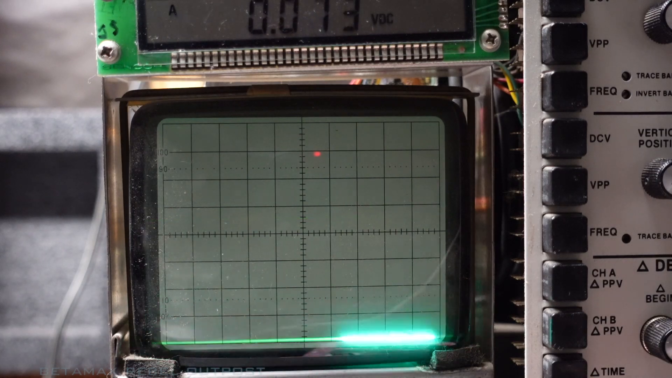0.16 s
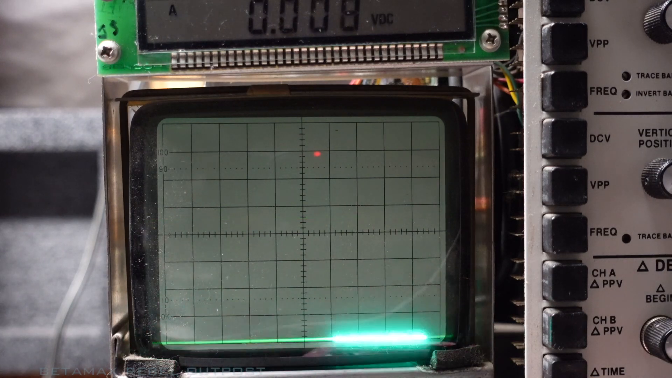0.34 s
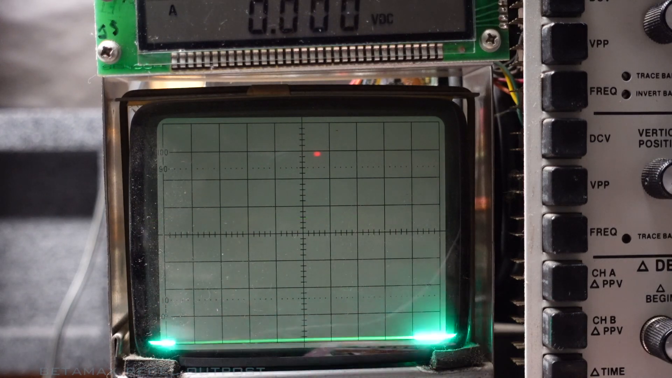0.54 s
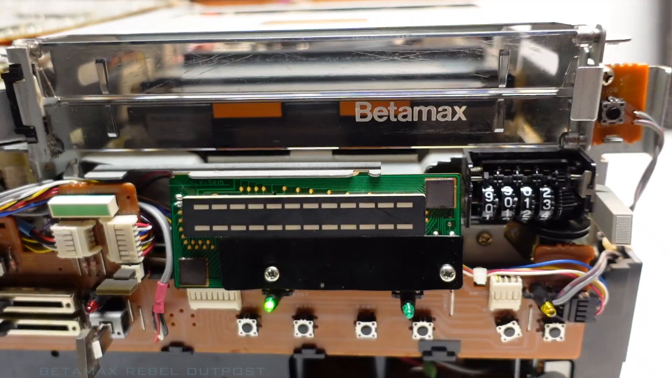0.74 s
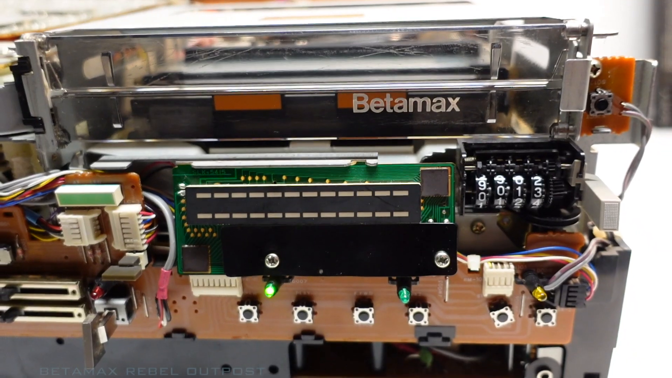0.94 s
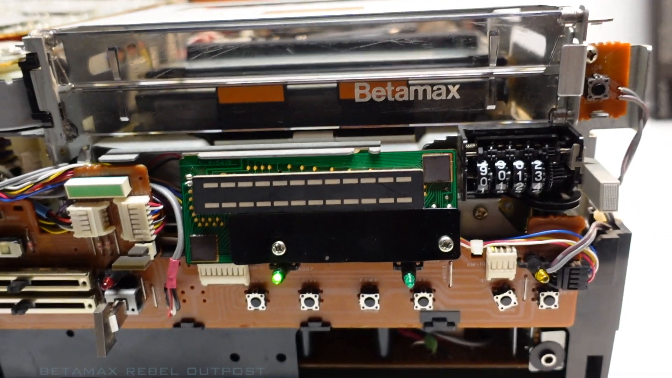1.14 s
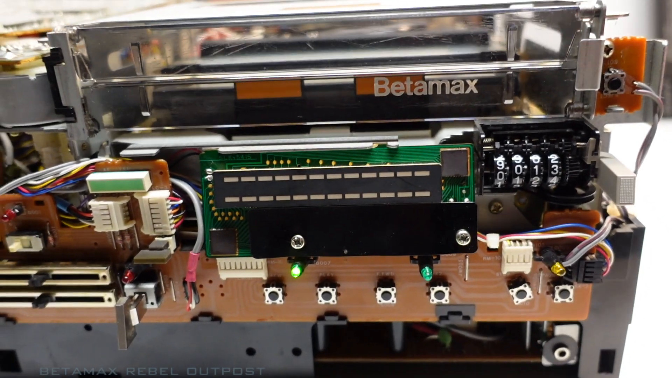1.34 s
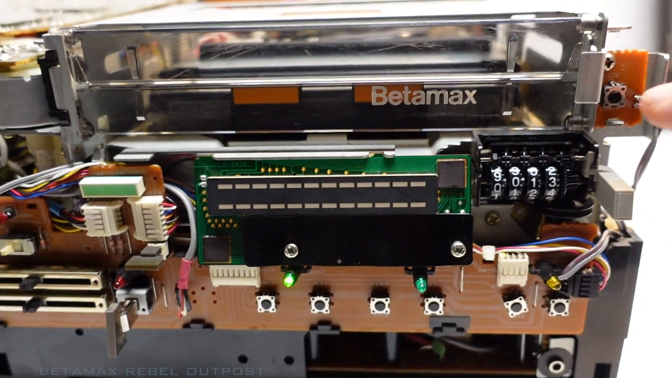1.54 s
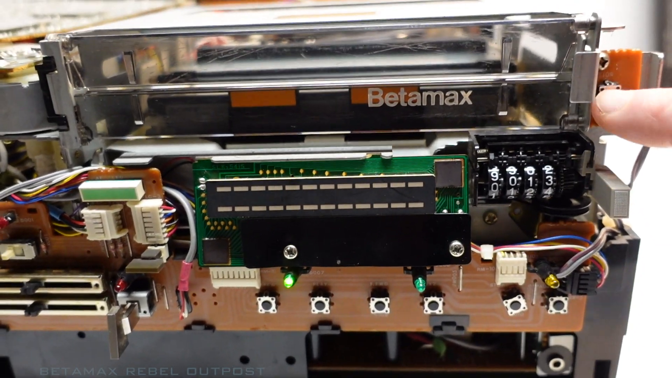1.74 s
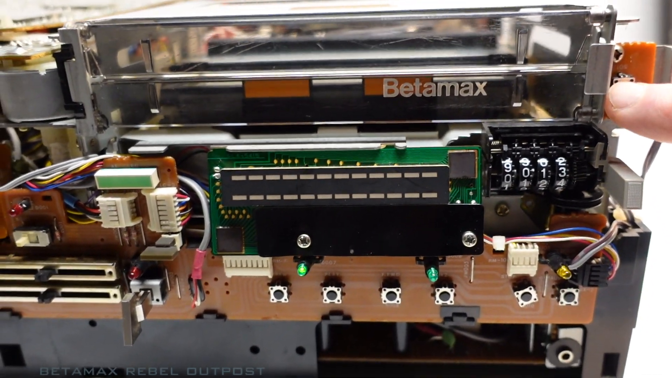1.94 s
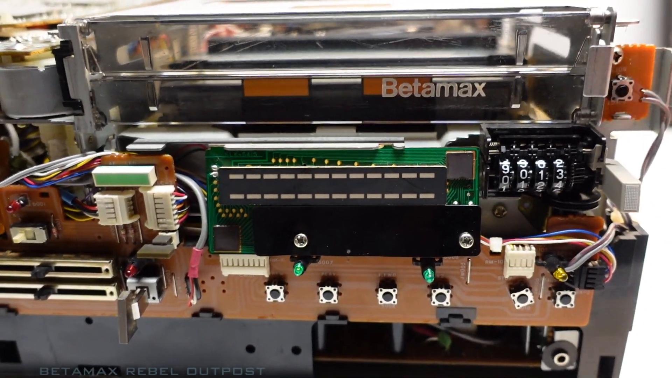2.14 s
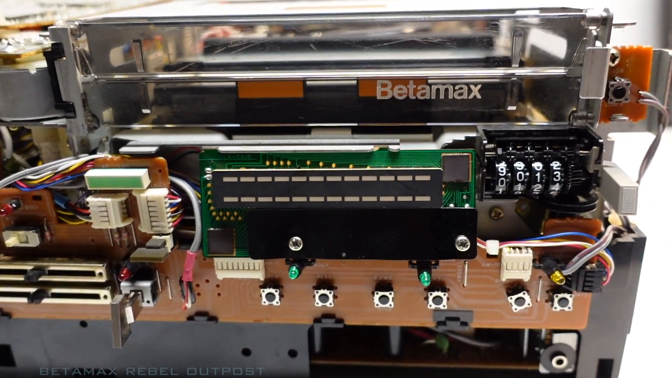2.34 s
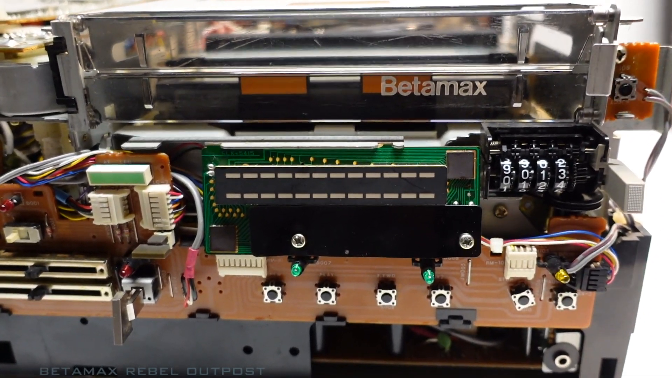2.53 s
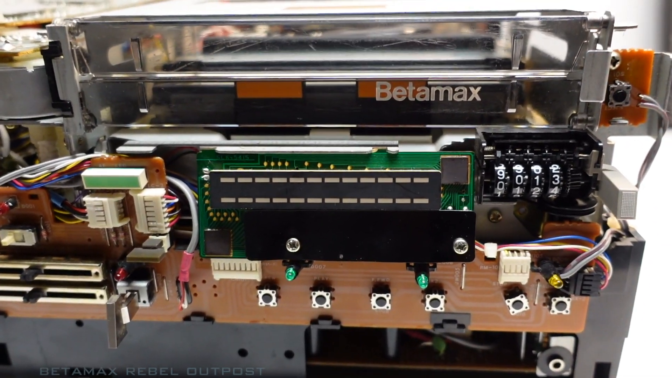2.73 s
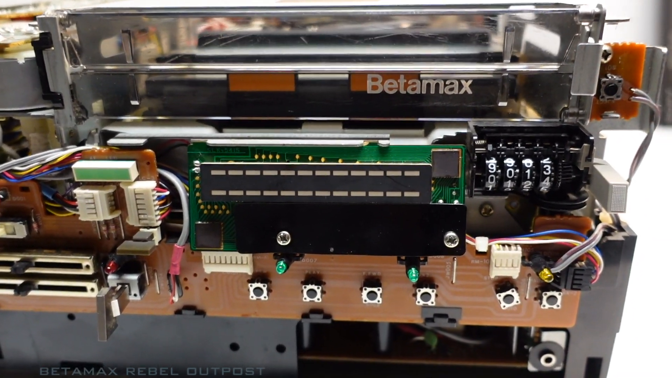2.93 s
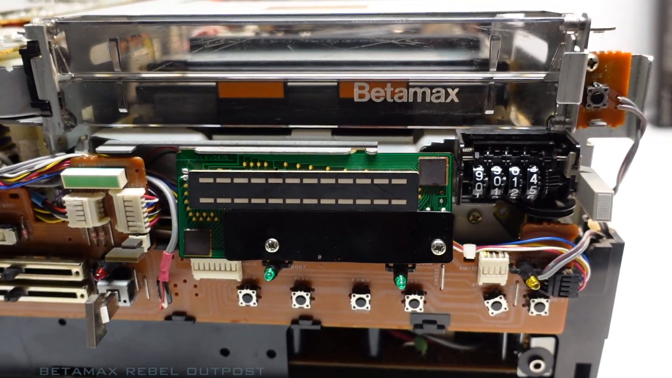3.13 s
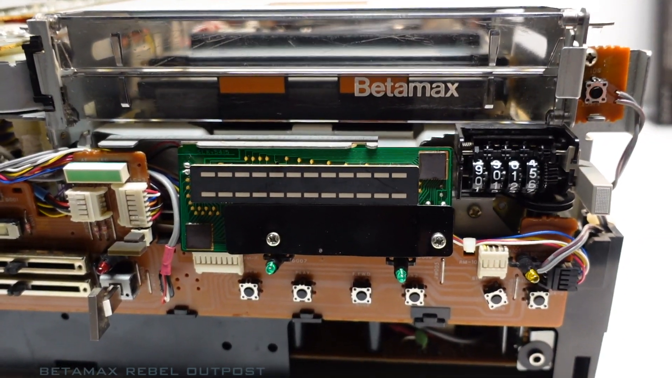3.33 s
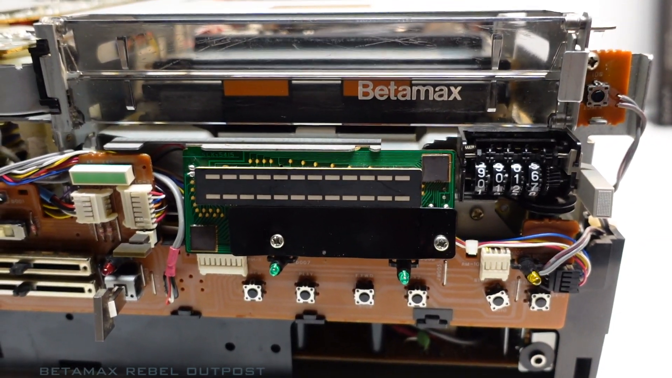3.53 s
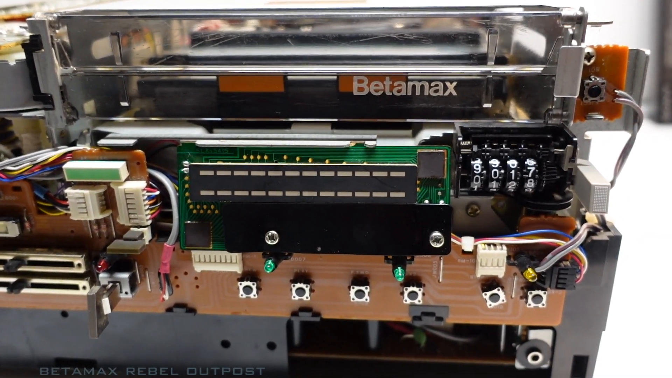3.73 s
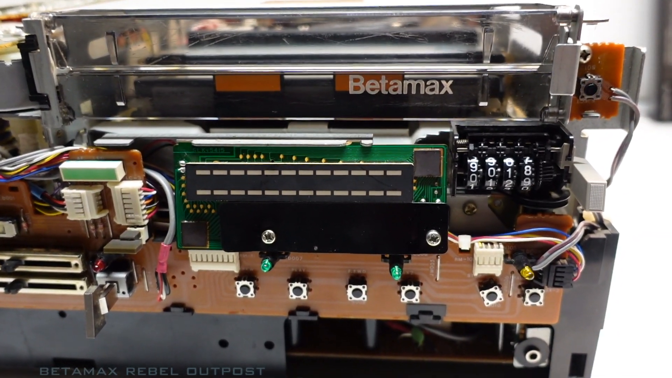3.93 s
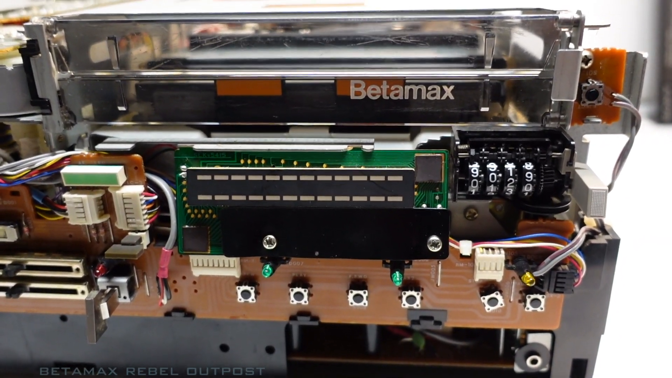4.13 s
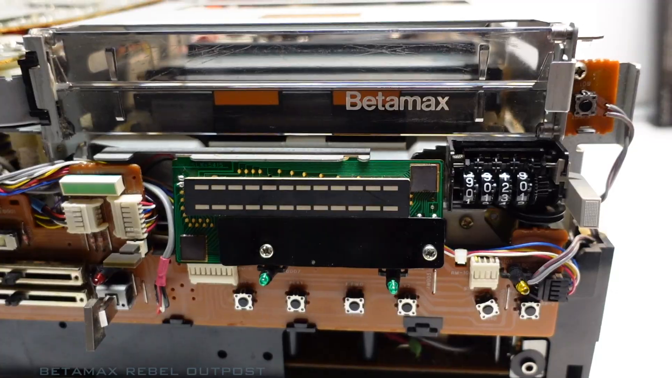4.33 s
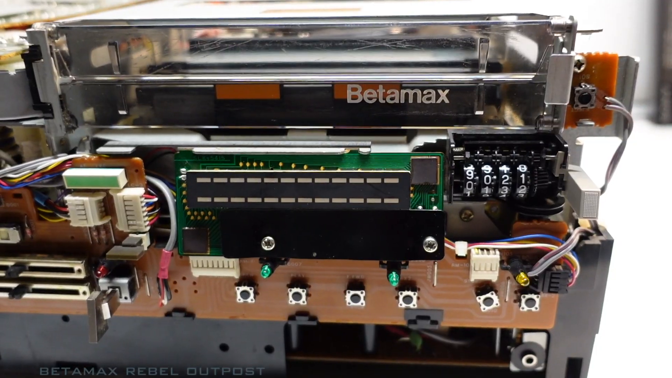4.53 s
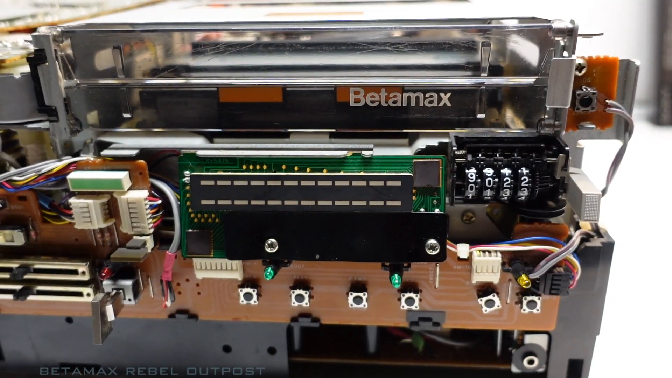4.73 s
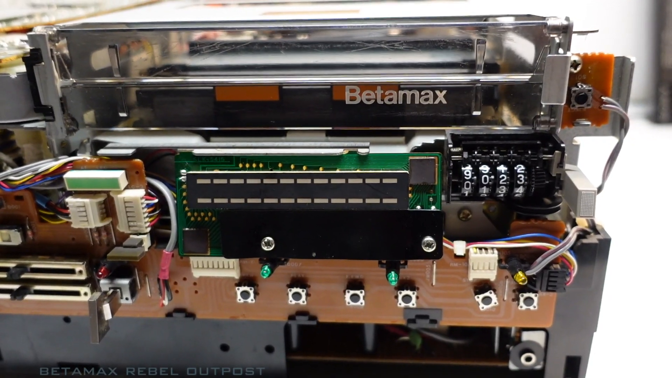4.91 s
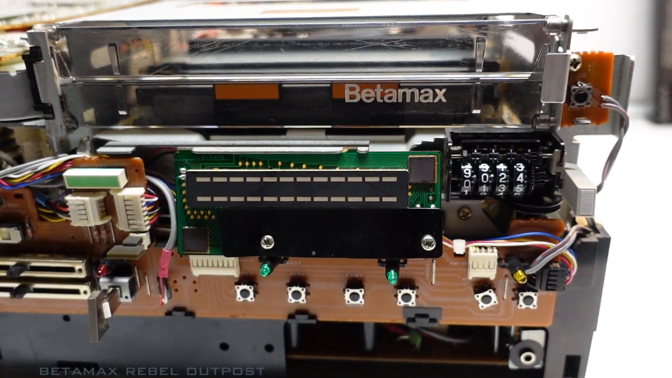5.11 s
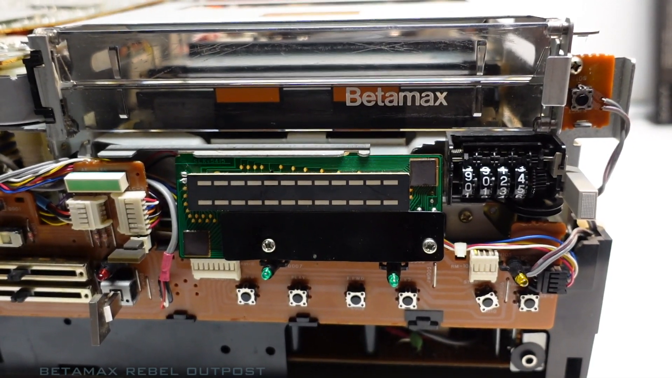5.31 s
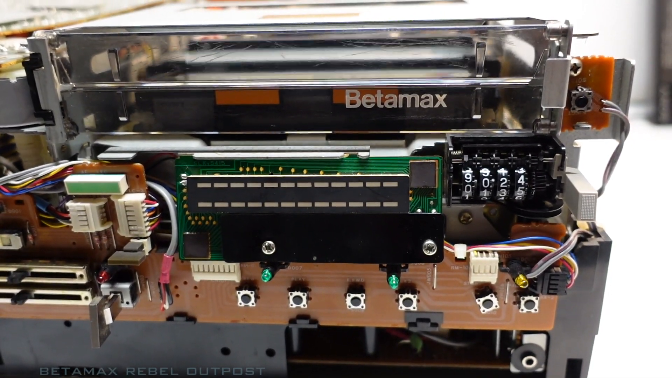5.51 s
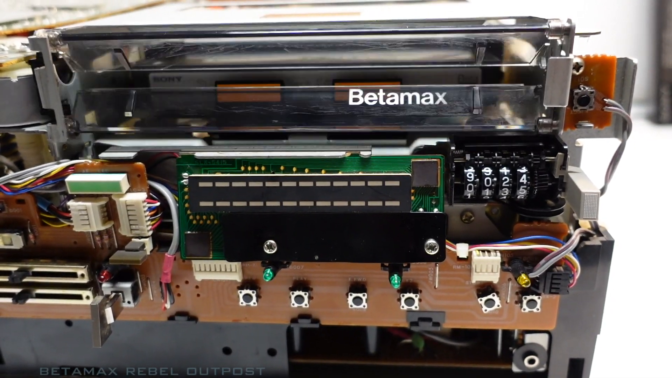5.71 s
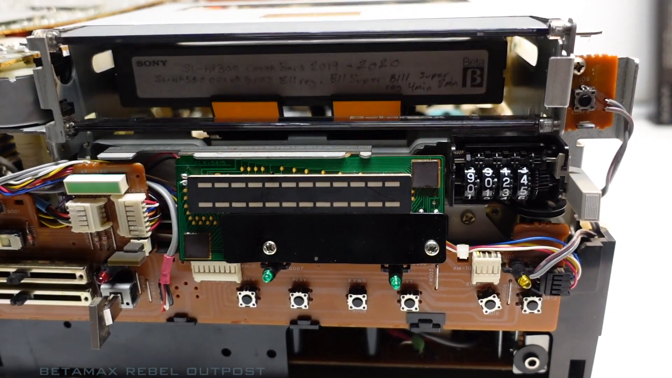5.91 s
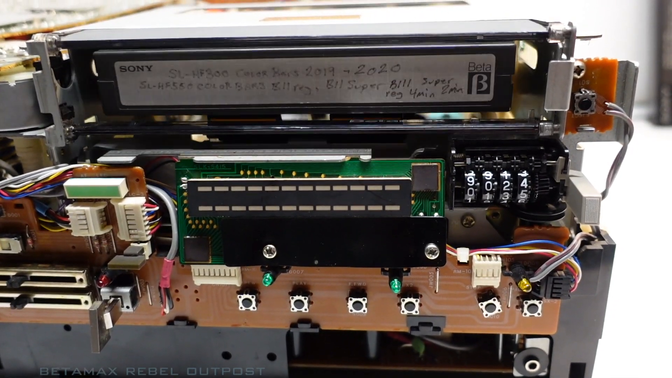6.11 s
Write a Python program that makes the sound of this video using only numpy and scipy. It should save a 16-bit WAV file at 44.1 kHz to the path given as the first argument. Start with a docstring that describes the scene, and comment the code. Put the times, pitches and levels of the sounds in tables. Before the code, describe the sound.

Up close, an opened tape deck idles, clacks heavily through its levers, whirs at speed, stops hard, then hisses and rattles its cassette upward.

```python
"""Open videocassette deck on a bench

First a picture tube whistles over the distant deck, made of wavering sine tones. Then, close up, the motor idles
and the reels wind tape: coloured noise with partials on top. Button, pawls, levers and the rising cassette
carriage are built from single blows, each a gritty noise burst, some with ringing modes. The brakes snap on and
an eject motor hisses before the carriage clatters up."""
import sys
import numpy as np
from scipy import signal
from scipy.fft import rfft, irfft, next_fast_len
from scipy.io import wavfile
from scipy.ndimage import map_coordinates

SR = 44100
rng = np.random.default_rng(int(sys.argv[2]) if len(sys.argv) > 2 else 0)


def put_to_file(sound):
    """Save the sound as 16-bit audio at rate SR, in the file named by the first command-line argument."""
    columns = np.atleast_2d(sound).T  # one column per channel
    safe = np.clip(columns, -1, 1)
    whole_steps = np.round(safe * 32767)
    wavfile.write(sys.argv[1], SR, whole_steps.astype(np.int16))


N = 271656

# Levels of contacts are relative: each source sets its own overall gain.
# Lever strokes. Each row: start in seconds, travel in seconds, level leaving in dB, level seating in dB,
# brightness leaving in dB, brightness seating in dB.
LEVER_STROKES = [(1.872, .018, -8, -16.5, -14, 19), (2.358, 0.016, -12.5, -8, -14, -4),
                 (2.4822, .011, -11, -6.5, 6, -6.5), (2.6605, .0203, -9.5, -7.5, 0.5, -5),
                 (5.1224, .0248, -4, -8.5, -7, 1)]
# Single clicks of pawls and springs. Each row: start in seconds, level in dB, hardness in dB.
SMALL_CLICKS = [(1.8655, -21.5, -6), (1.9467, -19, 12), (2.3525, -25, -13), (2.4738, -14, -2),
                (2.8666, -27, -18), (2.9083, -14, 5.5), (4.3054, -17.5, 11), (4.5448, -23, 8),
                (4.7047, -23, 10), (4.8019, -14.5, -10)]
# Latch clicks and knocks of the cage. Each row: start in seconds, level in dB, hardness in dB.
LATCH_CLICKS = [(5.5323, -21.5, 2.5), (5.5508, -20.5, -10), (5.5982, -7.5, 9.5), (5.7444, -27, -30),
                (5.7882, -21, -3.5), (6.0387, -29.5, -13), (6.1125, -15.5, -7), (6.136, -20.5, -4)]
# Snaps of the push button's dome. Each row: start in seconds, level in dB.
BUTTON_SNAPS = [(1.736, -28), (1.8003, -14.5)]
# The cage rubbing along its guides. Each row: time in seconds, level in dB.
SLIDING_LEVEL = [(5.7, -100), (5.8, -62), (5.818, -22.5), (5.835, -46), (5.87, -34), (5.92, -44),
                 (5.98, -36.5), (6.03, -53), (6.12, -42), (6.16, -46)]
# How hard the levers load the motor. Each row: time in seconds, load from 0 to 1.
MOTOR_LOAD = [(1.9, 0), (2.2, 1), (2.5, 0.8), (2.95, 0)]

# Ringing modes of the chassis and the cage. Each row: frequency in Hz, width in Hz, relative level in dB.
CHASSIS_MODES = [(755, 14, -1), (1313, 99, 5), (1855, 160, 9), (2730, 220, -1), (3150, 260, 11),
                 (3950, 380, 13), (4070, 19, 5), (5600, 110, -3), (7540, 100, 2), (8470, 33, 13),
                 (9840, 54, -6), (10300, 12.7, -4), (11900, 210, 9)]
CAGE_MODES = [(718, 130, 0.5), (1152, 98, -2), (2226, 170, 1), (3440, 50, -4), (5460, 75, -10),
              (6020, 105, 1.5), (8080, 210, 1), (8520, 210, 5), (9750, 140, -1.5), (11350, 80, -7.5),
              (13600, 84, -5), (14300, 91, -15)]
# Colours of the blows. Each row: frequency in Hz, relative spectral level in dB.
LEVER_COLOUR = [(88, -34), (150, -18.5), (612, -10), (759, -2), (941, -5.5), (2600, -0.5), (3420, -4),
                (4160, -0.5), (4950, -5.5), (5790, 0.5), (7320, -5), (15100, -7.5), (16000, -3)]
CARRIAGE_COLOUR = [(88, -40), (150, -35), (320, -16.5), (480, -15), (745, 0), (941, -15), (1340, -15),
                   (1790, -8.5), (3490, -11.5), (4410, -13.5), (6020, -5.5), (7320, -12), (8400, -11),
                   (9260, -16), (14200, -25.5), (16000, -26)]
CLICK_COLOUR = [(240, -71), (400, -9), (789, -10), (2290, 3), (2970, 1), (4050, 0), (6640, -3),
                (10100, -10), (16000, -19)]
BUTTON_COLOUR = [(2000, -32), (6000, -13.5), (10000, 5), (13000, -10), (16000, -29)]
# Colours of the booming bench and side panels. Each row: frequency in Hz, relative spectral level in dB.
BENCH_BOOM = [(60, -41), (95, -7.5), (120, -1.5), (148, 1.5), (185, -23), (300, -51), (600, -90)]
PANEL_BOOM = [(100, -27), (220, -15.5), (350, -1), (500, -6), (760, 2.5), (1100, -14.5), (2500, -35)]
# Colours of the running sounds. Each row: frequency in Hz, relative spectral level in dB.
WIND_COLOUR = [(24, -52), (40, -26), (106, -2.5), (180, -10.5), (320, -7.5), (444, -17), (529, -9),
               (852, -2.5), (1590, -7), (1810, 0), (2100, -9), (5870, -11.5), (9690, -20.5), (13100, -20.5),
               (16000, -25.5)]
EJECT_COLOUR = [(18, -33), (30, -3), (204, -4), (280, -11.5), (394, -4), (473, -12), (760, -3.5),
                (1590, -7.5), (1860, 0), (2170, -8.5), (5040, -12), (13000, -12.5), (14400, -22),
                (16000, -32)]
IDLE_COLOUR = [(88, -31), (150, -22.5), (439, -21.5), (1040, -13.5), (1360, -22.5), (1600, -13), (1790, 0),
               (2140, -17.5), (2980, -13.5), (3550, -23.5), (4200, -17.5), (5500, -18.5), (7040, -34),
               (7700, -25), (8500, -32), (10000, -25), (14500, -37), (16000, -36)]
ROOM_COLOUR = [(18, -73), (30, -39), (61, -17), (149, -26), (781, -21), (907, -13), (1140, -14),
               (1230, -19), (1660, -11), (1830, -30), (2080, -18.5), (3150, -21), (3600, -29.5),
               (5660, -23.5), (6570, -39.5), (10300, -28), (12000, -42), (15600, -81), (22000, -120)]
# Steady tones at nominal speed. Each row: frequency in Hz, level in dB rms before the source's own gain.
WIND_PARTIALS = [(107.7, -60), (323.0, -60), (532.9, -56.5), (850.6, -51), (1066, -51), (1330, -51.5),
                 (1809, -49), (2676, -58), (2842, -58)]
IDLE_PARTIALS = [(855.9, -67), (1055, -64), (1755, -61), (1793, -61), (1852, -51.5), (1985, -70),
                 (2245, -65.5), (2455, -66.5), (2649, -66.5), (3042, -65)]
FAR_PARTIALS = [(937, -74), (1852, -65), (1874, -60), (2302, -76)]
# Sizzle of the eject motor's brushes. Each row: frequency in Hz, width in Hz, level in dB rms at full speed.
BRUSH_BANDS = [(6900, 200, -66), (8500, 600, -66), (11200, 500, -66), (13800, 350, -53), (15000, 1500, -53)]
# Ringing-on of the case and room. Each row: frequency in Hz, 60 dB decay time in seconds.
ROOM_DECAY = [(200, 0.87), (700, 0.23), (1800, 0.23), (5000, 0.24), (13000, 0.14)]
# Stereo width. Each row: frequency in Hz, side level against mid in dB.
STEREO_WIDTH = [(60, -21), (130, -16), (250, -12), (1000, -14), (2000, -17), (4000, -22), (8000, -26),
                (14000, -24)]

CUT_HZ = 15900  # nothing sounds above this
CLOSE_S = .765  # the scene changes from the tube to the deck

CHASSIS_RING_DB = -22  # the strongest chassis mode's setting, before tilt and scatter
GRAZE_DB = -13  # halfway, every lever grazes its cam
BOUNCE_SHRINK, BOUNCE_LOSS_DB, BOUNCE_BRIGHT_DB = .85, 7.5, 6.5  # flight over the last, loss a bounce, brightness
# the cage runs up a toothed rack, loudest and hardest in mid travel
RACK_START_S, TOOTH_S, TOOTH_SCATTER_S = 5.8068, .0097, .0007
RACK_DB, RACK_SWELL_DB, RACK_HARD_DB, RACK_HARDENS_DB = -14, 5.5, -11, 21
# then it judders against its stop, each blow harder and chattering longer
STOP_S, JUDDER_S, STOP_DB = 5.8658, .0366, -7
STOP_HARD_DB, STOP_HARDENS_DB, STOP_CHATTER_S = -4, 7, 0.0024  # first blow; then added with each blow
# a pawl clicks ever louder before the brakes drop
PAWL_START_S, PAWL_STEP_S, PAWL_DB, PAWL_GROWS_DB = 5.0235, .0235, -26.5, 3.3
STRAY_PER_S, STRAY_DB, STRAY_SCATTER_DB, STRAY_IDLE_DB = 7, -33, 4, -4.5  # faint ticks, weaker before winding

# the reels take up slack, wind at full speed, and are braked
SLACK_S, SLACK_DB, WIND_S, WIND_DB = 2.36, -53.5, 2.87, -44
SPIN_UP_S, BRAKE_S, BRAKE_DB_PER_S = 0.013, 5.12, 91
EJECT_S, EJECT_RISE_S, EJECT_DB = 5.28, 0.046, -47
SAG = .04  # share of the idling motor's speed lost under full load
IDLE_DB, IDLE_END_S, IDLE_FALL_DB_PER_S = -48.5, 2.49, 20
# the motor's sheet-metal mount sings, louder under load and weaker from afar
MOUNT_HZ, MOUNT_DB, MOUNT_STRAIN_DB, MOUNT_FAR_DB = 1812, -55, 9.5, -14
LINE_HZ, TUBE_DB = 15690, -49  # level before the tube is placed left to right
HISS_DB, HISS_END_S, HISS_FALL_DB_PER_S = -52, 0.057, 190  # a short opening hiss


def levers():
    """Steel levers slam against the chassis and bounce; the crowded chassis rings only faintly."""
    loudest_db = np.max(np.array(CHASSIS_MODES)[:, 2])

    def clunk(knock_db, bright_db):
        return blow(LEVER_COLOUR, .15 * knock_db - 4, bright_db, t60=0.029, crack=2.3, grit_db=3, hold=0.0024,
                    modes=CHASSIS_MODES, ring_db=CHASSIS_RING_DB - loudest_db, ring_t60=0.11)

    clunks = amp(-10.5) * strike(lever_contacts(), clunk)
    bench_boom = amp(-22.0) * boom(clunks, t60=0.43, spectrum=BENCH_BOOM)
    panel_boom = amp(-17) * boom(clunks, t60=0.19, spectrum=PANEL_BOOM)
    return clunks + amp(-4.5) * echo(clunks) + bench_boom + panel_boom


def lever_contacts(count=2):
    """Each lever leaves its rest, grazes the cam halfway, seats, and bounces ever faster and weaker."""
    for s, travel_s, leave_db, seat_db, leave_bright, seat_bright in LEVER_STROKES:
        yield s, leave_db, leave_bright
        yield s + travel_s / 2, GRAZE_DB, (leave_bright + seat_bright) / 2
        yield s + travel_s, seat_db, seat_bright
        for k in np.arange(count) + 1:
            flown_s = travel_s * np.sum(BOUNCE_SHRINK ** np.arange(k + 1))
            yield s + flown_s, seat_db - BOUNCE_LOSS_DB * k, BOUNCE_BRIGHT_DB


def carriage():
    """The latch lets go and the sprung cassette cage rattles up to its stop, droning as it slides."""
    def clatter(knock_db, bright_db, chatter_s=0):
        return blow(CARRIAGE_COLOUR, knock_db, bright_db, t60=0.029, crack=1.3, grit_db=2.5,
                    hold=0.0045 + chatter_s, modes=CAGE_MODES, ring_db=-10.5, ring_t60=0.064)

    contacts = [*LATCH_CLICKS, *rack_contacts(), *stop_contacts()]
    rattle = amp(-11.5) * strike(contacts, clatter)
    drone_hz = 745 * (1 + .04 * wobble(14))
    drone = amp(curve(SLIDING_LEVEL)) * narrow(drone_hz, width_hz=135)
    bench_boom = amp(-30.5) * boom(rattle, t60=0.31, spectrum=BENCH_BOOM)
    panel_boom = amp(-22.5) * boom(rattle, t60=0.092, spectrum=PANEL_BOOM)
    return rattle + amp(-10.5) * echo(rattle) + bench_boom + panel_boom + drone


def rack_contacts(count=6):
    """The cage passes tooth after tooth, pressing hardest in mid travel."""
    for k, scatter in enumerate(rng.standard_normal(count)):
        press = np.sin(np.pi * (k + .5) / count)
        s = RACK_START_S + k * TOOTH_S + TOOTH_SCATTER_S * scatter
        yield s, RACK_DB + RACK_SWELL_DB * press, RACK_HARD_DB + RACK_HARDENS_DB * press


def stop_contacts(count=3):
    """The spring throws the cage against its stop at even intervals."""
    for k in range(count):
        yield STOP_S + k * JUDDER_S, STOP_DB, STOP_HARD_DB + k * STOP_HARDENS_DB, STOP_CHATTER_S * k


def ticks():
    """Small clicks of pawls, springs and running gear: short bursts without ringing modes."""
    def click(knock_db, bright_db):
        return blow(CLICK_COLOUR, knock_db, bright_db, t60=0.044, crack=1.6, grit_db=3.5)

    contacts = [*SMALL_CLICKS, *pawl_contacts(), *stray_contacts()]
    clicks = amp(-10.0) * strike(contacts, click)
    return clicks + amp(-10) * echo(clicks)


def pawl_contacts(count=4):
    """The brake pawl rides over its last teeth."""
    for k in range(count):
        yield PAWL_START_S + k * PAWL_STEP_S, PAWL_DB + k * PAWL_GROWS_DB, 0


def stray_contacts():
    """The running gear ticks at random until it is braked."""
    running_s = BRAKE_S - CLOSE_S
    for when, strength in rng.random((round(STRAY_PER_S * running_s), 2)):
        s = CLOSE_S + when * running_s
        db = STRAY_DB + STRAY_SCATTER_DB * (2 * strength - 1) + STRAY_IDLE_DB * (s < WIND_S)
        yield s, db, 4


def button():
    """The tiny metal dome snaps: bright and over at once."""
    snaps = np.zeros(N)
    for s, db in BUTTON_SNAPS:
        snap = blow(BUTTON_COLOUR, 0, 0, t60=0.0083, crack=2.7, grit_db=3.5)
        snaps[round(s * SR):][:len(snap)] += amp(db - 11.0) * snap
    return snaps + amp(-16) * echo(snaps)


def reels():
    """Tape rushes and sings over the guides; the loaded drive hums and rattles once a turn."""
    slack = amp(SLACK_DB - WIND_DB) * rising(SLACK_S, SPIN_UP_S)
    drive = np.maximum(slack, rising(WIND_S, SPIN_UP_S))
    drive = drive * falling(BRAKE_S, BRAKE_DB_PER_S) * amp(0.37 * wobble(3.93))
    speed = 1 + 0.00303 * wobble(4.6) + 0.001796 * wobble(40)
    rattle_db = np.cos(turning(106.6 * speed)) + 1.36 * wobble(500) + 0.9 * wobble(38)
    hum = tones(WIND_PARTIALS, speed, waver_db=2.5)
    singing = amp(-19.5) * narrow(12900, width_hz=400)
    return drive * (amp(WIND_DB) * (rush(WIND_COLOUR, rattle_db) + singing) + amp(-7) * hum)


def eject_motor():
    """A small fast motor spins up and hisses unevenly; its brushes' high sizzle grows with speed squared."""
    speed = rising(EJECT_S, EJECT_RISE_S)
    sizzle = sum(amp(level + wobble(16)) * narrow(hz, width) for hz, width, level in BRUSH_BANDS)
    return speed * amp(EJECT_DB) * rush(EJECT_COLOUR, 1.6 * wobble(40)) + speed ** 2 * sizzle


def idle_motor():
    """The unloaded motor whines and ticks faintly once a turn, slowing as the levers load it."""
    speed = 1 - SAG * curve(MOTOR_LOAD)
    ticking_db = 2 * np.cos(turning(110.0 * speed)) + 2 * wobble(1500) + 0.56 * wobble(12.0)
    whine = tones(IDLE_PARTIALS, speed * (1 + 0.0019 * wobble(25.01)), waver_db=3.5)
    running = close_up() * falling(IDLE_END_S, IDLE_FALL_DB_PER_S)
    return running * (amp(IDLE_DB) * rush(IDLE_COLOUR, ticking_db) + whine)


def mount():
    """The motor keeps its mount ringing in one narrow band."""
    db = MOUNT_DB + MOUNT_STRAIN_DB * curve(MOTOR_LOAD) + MOUNT_FAR_DB * (1 - close_up())
    return amp(db) * (0.9 * narrow(MOUNT_HZ, width_hz=70) + 0.095 * narrow(MOUNT_HZ, width_hz=230))


def tube():
    """The picture tube's line whistle and the deck's far, beating whine, heard until the scene changes to the
    deck."""
    level = amp(TUBE_DB + 2.7 * wobble(40.2))
    whistle = level * np.sqrt(2) * np.sin(turning(LINE_HZ + 12 * wobble(20)))
    far_whine = tones(FAR_PARTIALS, 0.99, waver_db=4.0)
    return (1 - close_up()) * (whistle + far_whine)


def bench():
    """Room tone as steady coloured noise, with a short hiss at the start."""
    hiss = amp(HISS_DB) * falling(HISS_END_S, HISS_FALL_DB_PER_S) * rush(CLICK_COLOUR)
    return amp(-66.5) * rush(ROOM_COLOUR) + hiss


def blow(colour, knock_db, bright_db, t60, crack, grit_db, hold=0, modes=(), ring_db=-60, ring_t60=.1, size=16384):
    """One contact: a crack, a gritty burst held while the parts chatter, and the part's modes ringing on."""
    t = np.arange(size) / SR
    hz = np.fft.rfftfreq(size, 1 / SR)
    # the grit: a new random level every millisecond
    chatter = amp(grit_db * np.interp(t, np.arange(400) / 1000, rng.standard_normal(400)))
    decay = amp(-60 * np.maximum(t - hold, 0) / max(t60, .002))
    burst = rng.standard_normal(size) * unit(chatter) * decay
    burst[0] += crack
    tilt = [(450, knock_db / 2), (780, knock_db), (2100, 0), (5500, 0), (9000, bright_db)]
    # every point of contact favours its own set of the part's many modes
    ripple_db = 3 * np.interp(hz, np.arange(128) * 180, rng.standard_normal(128))
    gain = amp(along(colour, hz) + along(tilt, hz) + ripple_db)
    x = causal(burst, unit(gain * (hz < CUT_HZ + 1000)) + amp(-32))
    for centre, width, db in modes:
        # each mode shifts a little at every blow; narrow ones last longer
        pitch, strength, phase = rng.standard_normal(3)
        life = ring_t60 * np.sqrt(100 / width)
        ring = amp(ring_db + db + along(tilt, centre) / 2 + 2.9 * strength - 60 * t / life)
        shifted = centre * (1 + .018 * pitch)
        x += ring * np.sin(2 * np.pi * (shifted * t + phase)) * (1 - np.exp(-t / 0.00035))
    return x


def strike(contacts, voice):
    """Lays out (seconds, dB, hardness dB) contacts; a hard one is brighter and knocks less."""
    out = np.zeros(N + SR)
    for s, db, hard_db, *rest in contacts:
        x = amp(db) * voice(-hard_db, hard_db, *rest)
        out[round(s * SR):][:len(x)] += x
    return out[:N]


def boom(x, t60, spectrum):
    """Blows set a large surface booming; it swells after them and dies away."""
    t = np.arange(SR // 2) / SR
    swell = (amp(-60 * t / t60) * (1 - np.exp(-t / 0.02))) ** 2
    energy = np.abs(signal.fftconvolve(x ** 2, swell / swell.sum())[:N])
    return np.sqrt(energy) * rush(spectrum)


def echo(x, count=24):
    """The case and the room ring on as decaying noise, a little differently from moment to moment."""
    out = np.zeros(N + 2 * SR)
    for part in np.array_split(np.arange(N), count):
        hz, t, z = signal.stft(rng.standard_normal(SR // 2), SR, nperseg=256)
        tail = signal.istft(z * amp(-60 * t / along(ROOM_DECAY, hz)[:, None]), SR)[1]
        tail *= 1 - np.exp(-np.arange(len(tail)) / SR / 0.0037)
        wet = signal.fftconvolve(x[part], tail / np.linalg.norm(tail))
        out[part[0]:][:len(wet)] += wet
    return out[:N]


def tones(lines, speed, waver_db):
    """Partials that follow a shaft's speed, each wavering in strength."""
    return sum(np.sqrt(2) * amp(db + waver_db * wobble(37)) * np.sin(turning(hz * speed)) for hz, db in lines)


def narrow(hz, width_hz):
    """A randomly shaken resonance of rms 1."""
    return unit(wobble(width_hz) * np.cos(turning(hz)) + wobble(width_hz) * np.sin(turning(hz)))


def rush(spectrum, grain_db=0):
    """Coloured noise of rms 1, its excitation swelling by grain_db."""
    return unit(filtered(rng.standard_normal(N) * amp(grain_db), lambda hz: amp(along(spectrum, hz))))


def turning(hz):
    """Phase in radians of something that turns at hz, from a random start."""
    return 2 * np.pi * (np.cumsum(hz * np.ones(N)) / SR + rng.random())


def wobble(rate):
    """A smooth random curve, rate knots a second."""
    return map_coordinates(rng.standard_normal(int(N * rate / SR) + 4), [np.arange(N) * rate / SR])


def rising(start_s, rise_s):
    """Gain of something that starts up, with time constant rise_s."""
    return 1 - np.exp(-np.maximum(np.arange(N) / SR - start_s, 0) / rise_s)


def falling(stop_s, db_per_s):
    """Gain of something that runs down."""
    return amp(-db_per_s * np.maximum(np.arange(N) / SR - stop_s, 0))


def close_up():
    """0 at the tube, 1 at the deck."""
    return rising(CLOSE_S, rise_s=0.0062)


def curve(points):
    """(seconds, value) points joined by straight lines, one value per sample."""
    s, values = np.transpose(points)
    return np.interp(np.arange(N) / SR, s, values)


def along(points, hz):
    """(Hz, value) points on a log axis."""
    f, v = np.transpose(points)
    return np.interp(np.log(hz + 1), np.log(f + 1), v)


def causal(x, gain):
    """A short sound coloured by a gain per frequency bin, minimum phase: nothing ahead of its attack."""
    n = len(x)
    cepstrum = irfft(np.log(gain), n)
    cepstrum[1:n // 2] *= 2
    cepstrum[n // 2 + 1:] = 0
    return irfft(rfft(x) * np.exp(rfft(cepstrum)), n)


def filtered(x, response):
    """x times a response of frequency."""
    m = next_fast_len(N + SR // 2)
    return irfft(rfft(x, m) * response(np.fft.rfftfreq(m, 1 / SR)), m)[..., :N]


def amp(db):
    """Decibels to gain."""
    return 10 ** (np.asarray(db) / 20)


def unit(x):
    """Scaled to rms 1."""
    return x / np.sqrt(np.mean(x ** 2) + 1e-20)


def scene():
    """The deck stands straight ahead, widened by a phase-shifted side signal; the tube is to the right."""
    mechanism = levers() + carriage() + ticks() + button()
    mid = mechanism + reels() + eject_motor() + idle_motor() + mount() + bench()
    # a quarter turn of phase and 9 ms of delay
    side = filtered(mid, lambda hz: 1j * amp(along(STEREO_WIDTH, hz)) * np.exp(-2j * np.pi * hz * .009))
    return np.array([mid + side, mid - side]) + tube() * amp([[-2.5], [2]])


def record(dry):
    """Rounds off the highest peaks, thins the deepest bass and keeps nothing above the band limit."""
    rounded = dry / (1 + np.abs(dry / .5) ** 4) ** (1 / 4)
    return filtered(rounded, lambda hz: (hz < CUT_HZ) * hz ** 2 / np.sqrt(hz ** 4 + 40 ** 4))


dry = scene()
out = record(dry)
put_to_file(out)
```